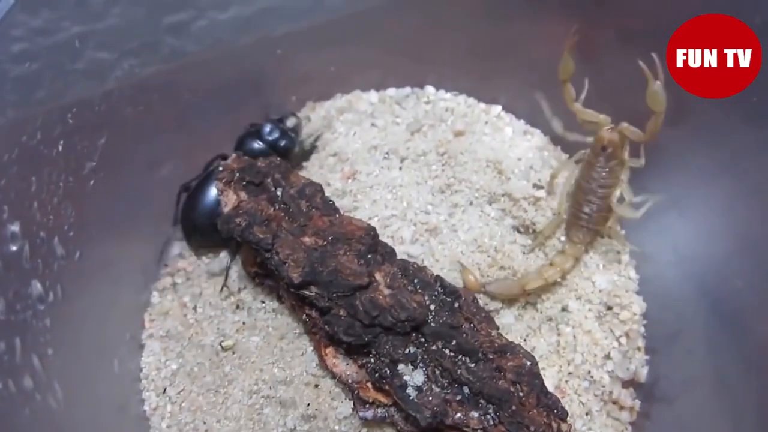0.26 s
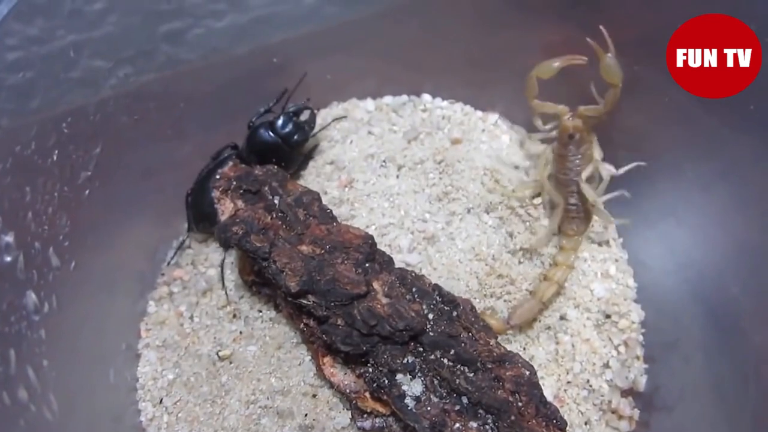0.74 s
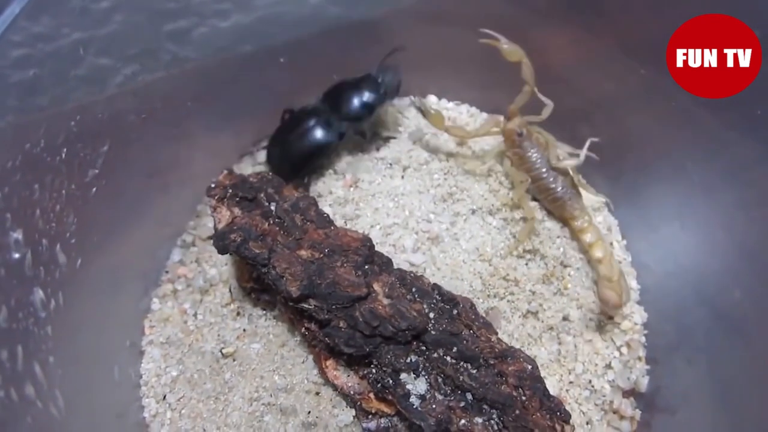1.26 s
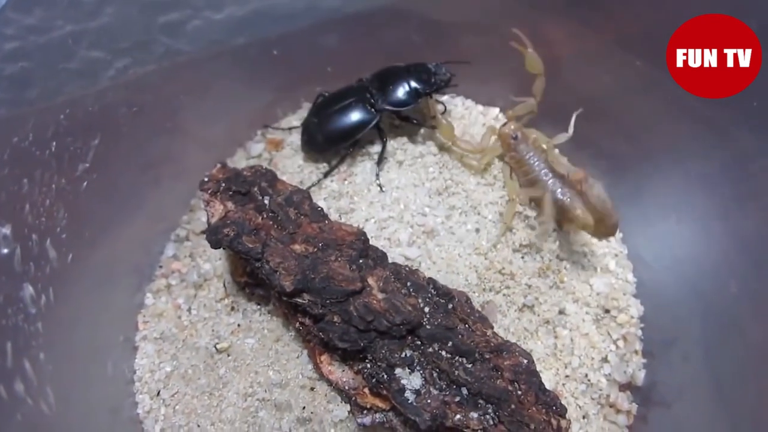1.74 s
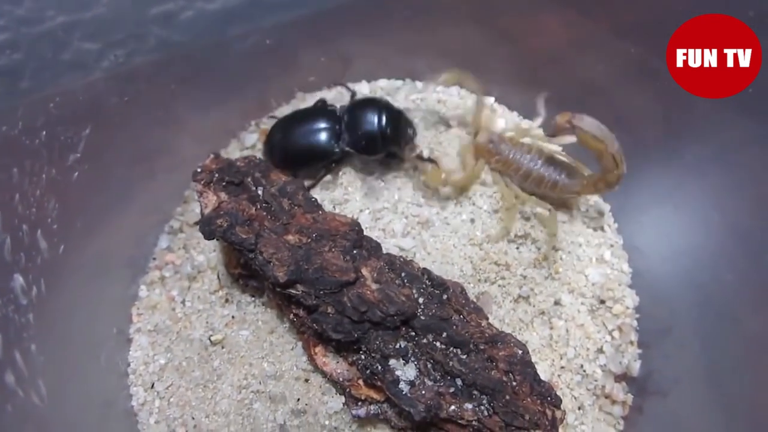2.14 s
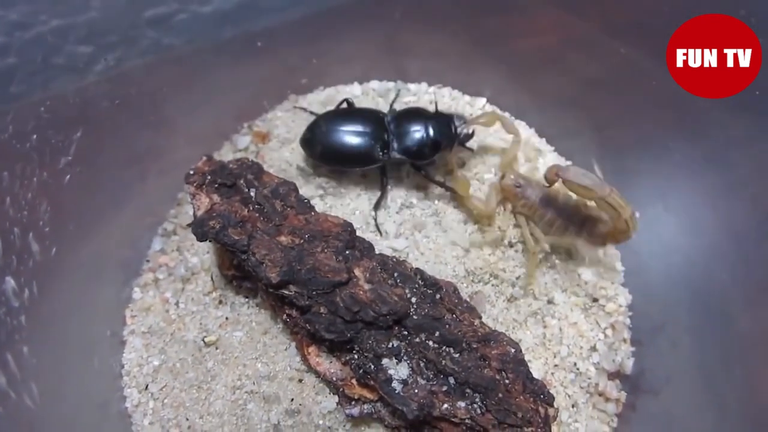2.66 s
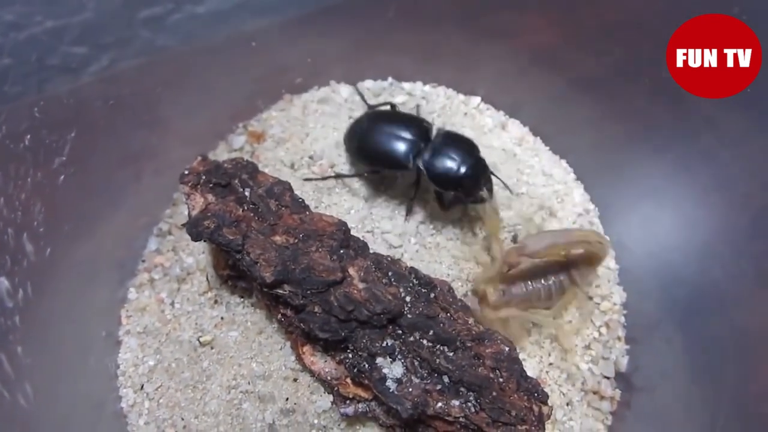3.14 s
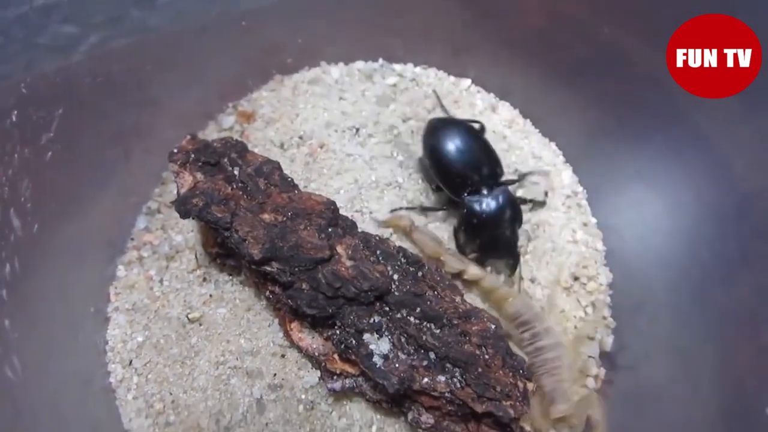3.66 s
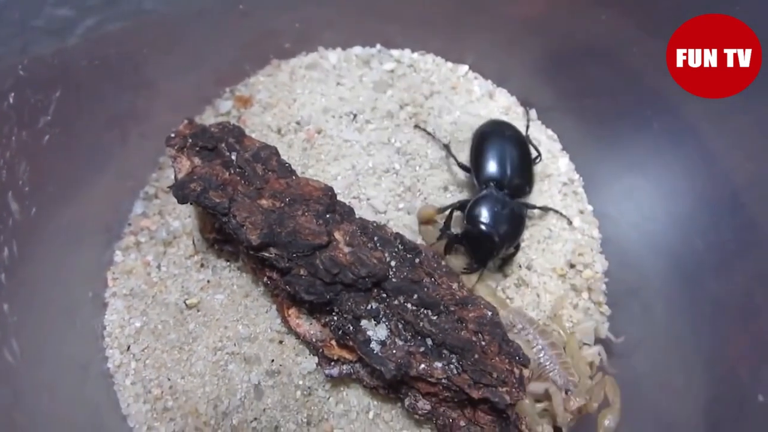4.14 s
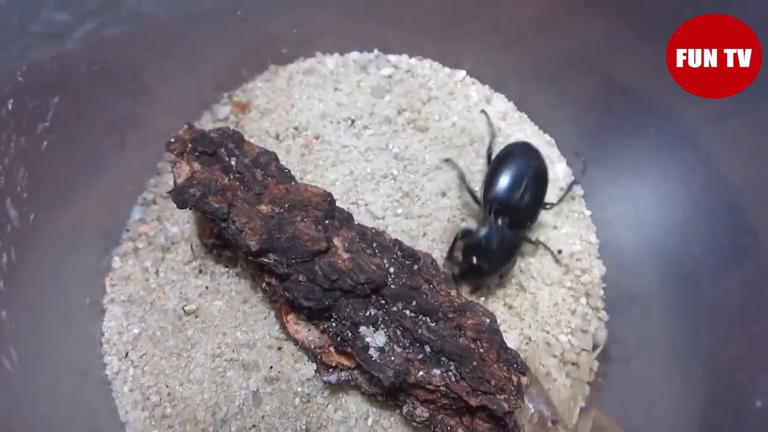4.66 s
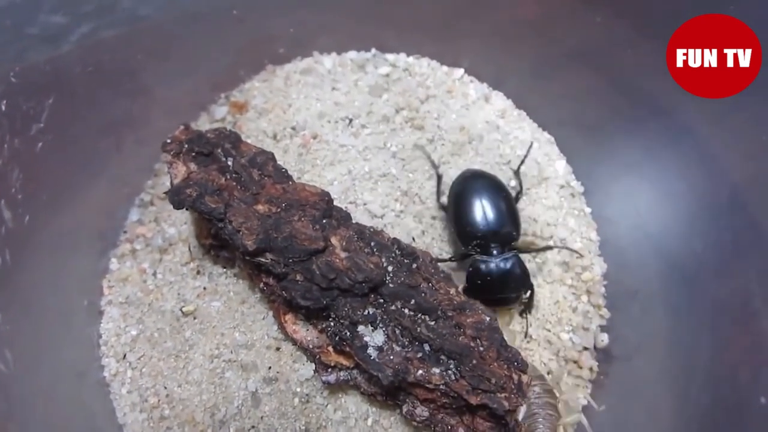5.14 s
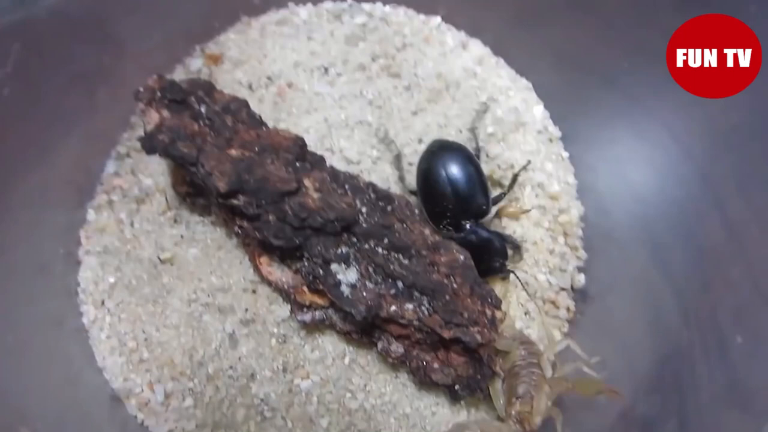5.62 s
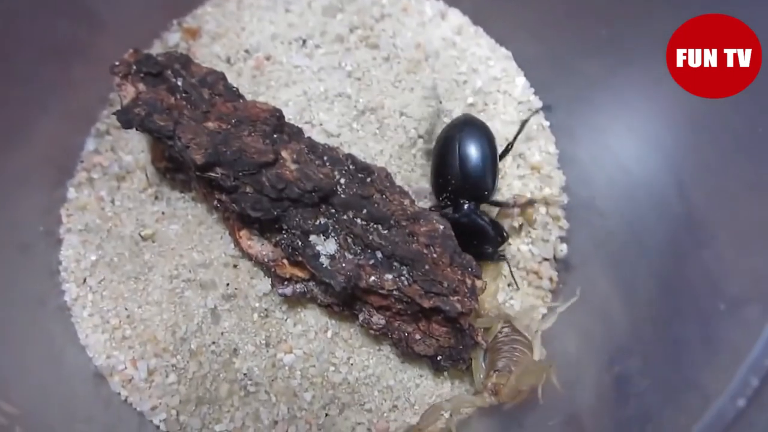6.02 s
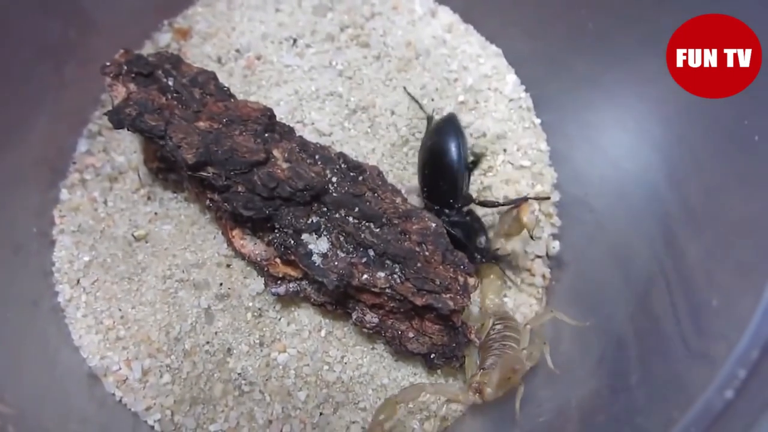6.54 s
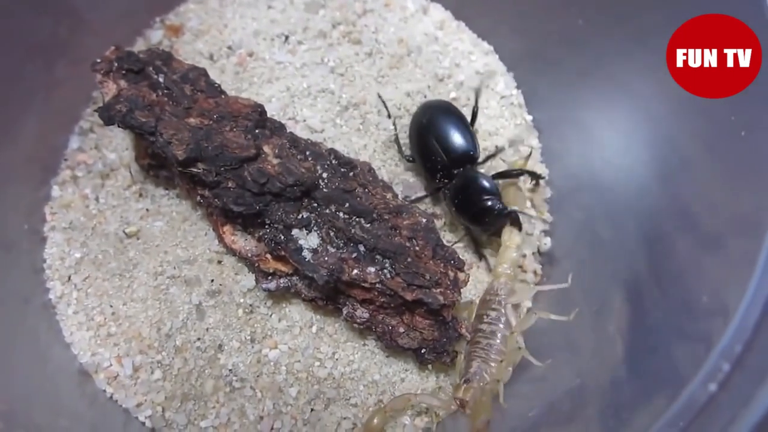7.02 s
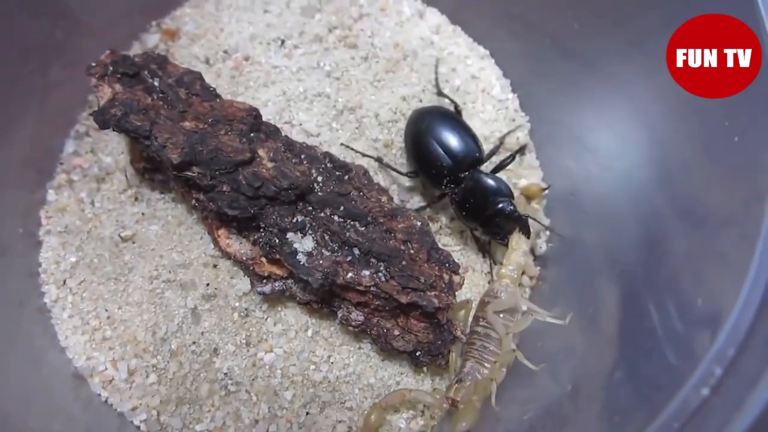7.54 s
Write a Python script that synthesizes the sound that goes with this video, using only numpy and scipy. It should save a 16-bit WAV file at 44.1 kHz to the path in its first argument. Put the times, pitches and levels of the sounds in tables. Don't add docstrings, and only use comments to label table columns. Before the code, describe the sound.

In a quiet room, heard from close above a small plastic tub of sand and bark, a beetle and scorpion scuffle over a constant low fan drone with slight hiss and very faint high whines. From 0 to 0.6 seconds a few crisp claw ticks and tiny skids ring on the plastic wall. After a brief lull, they gather from 0.9 into a dense, loud clatter with scratchy slips, brightest around 1.75, ending near 2. From 2 to 3.5 come softer, sparse shell ticks and sandy rustles. A distinct click lands at 3.6, then gritty leg strokes, with a small cluster of ticks around 4.55 to 4.8. Between 5 and 7 delicate jaw clicks and digging scrapes come and go, some sharp at 6.0, 6.2 and 7.05. Stronger snaps strike at 7.3 and 7.55, then only faint sand trickle and hum remain.

```python
import sys
import numpy as np
from scipy import signal
from scipy.fft import rfft, irfft, next_fast_len
from scipy.io import wavfile
from scipy.ndimage import map_coordinates

SR = 44100
rng = np.random.default_rng(int(sys.argv[2]) if len(sys.argv) > 2 else 0)


def gain_from_db(level_db):
    decades = np.asarray(level_db, float) / 20
    return 10 ** decades


def file_out(sig):
    cols = np.atleast_2d(sig).T
    lim = np.clip(cols, -1, 1)
    pcm = np.round(lim * 32767).astype(np.int16)
    wavfile.write(sys.argv[1], SR, pcm)


N = 343098

# t/s, peak level/dB, ring f/Hz, bright edge level/dB the
WALL_TICKS = [(0.906, -34, 5090, -8), (0.2314, -29.5, 4740, -19), (0.307, -22.5, 4250, -12),
              (0.32, -49, 7200, -16), (0.3791, -25.5, 5560, -24), (0.5385, -26, 6240, -6),
              (0.548, -30, 5600, -6), (0.928, -26.5, 5400, -12), (0.952, -24, 5430, -9),
              (0.964, -20.5, 6230, -4), (1.111, -16, 7060, 13), (1.134, -28, 5400, -14),
              (1.225, -19, 9230, -10), (1.2831, -24.5, 4880, 2), (1.3, -17, 6600, -11),
              (1.3611, -12.5, 4870, -18), (1.3682, -21.5, 2260, -21), (1.4124, -13, 7000, -8),
              (1.494, -36, 5360, -8), (1.526, -22.5, 7100, -21), (1.5816, -16.5, 6400, -19),
              (1.6425, -24.5, 5900, -19), (1.7097, -26, 4710, 5), (1.7323, -28, 7200, 5),
              (1.75, -14.5, 4600, 6.5), (1.761, -21, 8150, 12), (1.9025, -20.5, 4800, 3),
              (1.9582, -27, 6650, -8), (1.9796, -20.5, 4400, -28),
              (0.0989, -37, 6400, -10), (0.1785, -31, 7500, -13), (0.2728, -32, 5210, 5),
              (0.2919, -38, 4440, -10), (0.5455, -30, 7320, -5), (0.7785, -41, 6100, -12),
              (0.794, -36, 6350, 2), (0.9018, -37, 9300, 7), (0.9354, -27, 4260, -14),
              (0.9668, -22, 5800, -13), (0.9756, -27, 5900, 2), (1.035, -27, 7060, 0),
              (1.0395, -30, 11710, 5), (1.0714, -29, 6160, -13), (1.1047, -24, 6590, 4),
              (1.1291, -25, 7880, 1), (1.1634, -35, 5300, -7), (1.21, -25, 5330, -4),
              (1.2143, -22, 9430, 7), (1.2328, -25, 5040, -9), (1.2719, -30, 6070, -13),
              (1.2945, -30, 6550, -6), (1.3411, -34, 8400, 0), (1.381, -27, 5810, -9),
              (1.4004, -19, 7110, -14), (1.419, -23, 5340, -12), (1.468, -32, 7920, -5),
              (1.4974, -33, 5250, -15), (1.5136, -33, 5300, -14), (1.5337, -23, 5400, -19),
              (1.5444, -20, 7600, -12), (1.5621, -31, 5510, -13), (1.5653, -34, 6850, -14),
              (1.6065, -15, 7600, -13), (1.7539, -22, 6200, 2), (1.768, -26, 7970, 14),
              (1.7769, -28, 8310, 9), (1.7857, -34, 10290, 13), (1.8109, -32, 8910, 16),
              (1.8829, -27, 5080, 2), (1.9147, -35, 9650, 7)]
GRAPPLE_TICKS = [(2.041, -41, 3480, -17), (2.1869, -39.5, 4890, 0), (2.3235, -33, 5500, 7),
                 (2.6976, -40, 5440, -3), (2.845, -35, 6540, -14), (2.9263, -31, 6090, 2),
                 (2.9882, -28, 5350, 6), (3.0064, -30, 8340, 0), (3.157, -41, 3830, -5),
                 (3.161, -34, 2330, -22), (3.6102, -17.5, 5300, -37), (3.961, -40, 3630, -5),
                 (4.0243, -34, 8090, 1), (4.549, -25.5, 6650, -16), (4.5825, -29, 6690, 2),
                 (4.594, -27, 5890, 11), (4.6057, -34, 6840, 0), (4.613, -29.5, 6960, -1),
                 (4.6378, -30, 5260, -16), (4.711, -33, 5100, -20), (4.724, -36, 5200, -24),
                 (4.888, -35, 5470, -9), (5.0356, -34, 5400, -3), (5.1804, -36.5, 4900, -18),
                 (5.2566, -34, 5100, -21), (5.2655, -35.5, 5400, -19),
                 (2.0764, -42, 5170, -10), (2.1145, -44, 7060, -7), (2.2646, -35.5, 5300, 2),
                 (2.6102, -37, 6930, 0), (2.7359, -44, 5940, -6), (2.8734, -37, 5120, -13),
                 (2.8815, -38, 5210, -14), (3.0154, -34, 5250, 3), (3.0225, -31, 7410, 4),
                 (3.0437, -40, 5080, -3), (3.3716, -31, 11630, 14), (3.3813, -36, 5250, 2),
                 (3.6424, -33.5, 5340, -3), (3.7068, -37, 5170, -17), (3.7314, -36, 5040, -10),
                 (3.7513, -38, 5470, -12), (3.9108, -41, 3790, 7), (4.0108, -38, 6760, -1),
                 (4.0618, -37, 5080, -7), (4.2591, -37, 5080, 0), (4.279, -38, 5170, -1),
                 (4.284, -40, 5080, -13), (4.3864, -41, 5680, -19), (4.558, -23.5, 8230, 4),
                 (4.6946, -39, 6140, -10), (4.727, -33.5, 5080, -10), (4.7477, -44, 5510, -22),
                 (4.7533, -39, 4910, -24), (4.7637, -35, 5040, -21), (4.769, -36, 5000, -23),
                 (4.7799, -35, 5170, 1), (4.9444, -35, 5680, -12), (5.2264, -42, 3830, -12)]
TUG_TICKS = [(5.675, -35, 5470, -4), (5.8097, -38, 5220, -15), (5.8378, -34, 5260, -23),
             (5.8534, -34, 6100, -20), (6.034, -25, 5660, 8), (6.0405, -28, 6140, -6),
             (6.1087, -29, 4970, -21), (6.214, -33, 5500, -16), (6.2314, -26.5, 12000, 22),
             (6.2537, -31, 12000, 22), (6.4332, -34, 5100, -6), (6.52, -34.5, 4140, -5),
             (6.6804, -35.5, 6600, -1), (6.747, -34.5, 5260, -18), (6.977, -42, 5400, -11),
             (7.0091, -42, 4980, -5), (7.0406, -30, 5480, 17), (7.053, -27, 5560, 11),
             (7.059, -28, 5640, -11), (7.073, -35, 5580, -14), (7.0903, -38, 5100, -5),
             (7.286, -38, 2300, -24), (7.295, -34, 2100, -24), (7.304, -19.5, 5270, -22),
             (7.306, -31, 2200, -24), (7.547, -25, 2950, -24), (7.56, -34, 11500, 14),
             (7.604, -38.5, 2000, -24), (6.779, -35, 9000, 8), (7.128, -40, 9000, 10),
             (7.332, -36, 5300, 2), (7.3414, -25, 4000, 1), (7.4767, -28.5, 5360, 4),
             (7.546, -17.5, 3940, -0.5), (7.5493, -12.5, 6330, 14), (7.556, -34, 5000, -11),
             (5.5899, -41, 5340, 0), (5.6934, -43, 5300, -10), (5.7384, -36, 4820, -16),
             (5.7419, -41, 5700, -17), (5.8024, -39, 5300, -17), (5.8445, -36, 5600, -17),
             (5.864, -36, 5120, -16), (5.8866, -47, 5730, -1), (6.101, -33, 5600, -21),
             (6.1216, -38, 5500, -16), (6.199, -39, 5000, -13), (6.2486, -37, 7320, 8),
             (6.2858, -44, 5250, -14), (6.358, -35.5, 5900, -16), (6.4697, -40, 5640, -14),
             (6.4834, -42, 5340, -15), (6.507, -42, 5380, -17), (6.5902, -45, 5080, -12),
             (6.7582, -36, 6030, -13), (7.0765, -39, 3920, -8), (7.1327, -45, 5040, -10),
             (7.2524, -43, 5560, -18), (7.2986, -43, 5040, -9), (7.3559, -30, 5860, 12),
             (7.3776, -37, 3800, -4), (7.5371, -30, 11670, 7)]


def ticks():
    on_wall = WALL_TICKS
    off_wall = GRAPPLE_TICKS + TUG_TICKS
    start_s, peak_db, ring_hz, edge_db = np.transpose(on_wall + off_wall)[:, :, None]
    count = len(start_s)
    on_sand = (np.arange(count) >= len(on_wall))[:, None]

    knock_db = -15.5 - 14 * np.log2(ring_hz / 5000) + 1.5 * rng.standard_normal(start_s.shape)
    knock_db = knock_db - 5 * on_sand

    t = np.arange(1024) / SR
    rattle = 0.1 * gain_from_db(-60 * t / 0.011)
    echo = 0.008 * gain_from_db(-60 * t / 0.05)
    blows = rng.standard_normal((count, len(t))) * (rattle + echo)
    blows[:, 0] = -1.4

    def blunt_tip(f):
        treble_loss = 1 + (1j * f / 11000) + (1j * f / 12500) ** 2
        return mode(f, np.sqrt(5200 * ring_hz), 6700) / treble_loss

    body, edge = contact(blows, ring_hz, on_sand)
    body = filtered(body, blunt_tip)
    knock = filtered(blows, lambda f: mode(f, 2370, 1400) ** 2)

    def equal_energy(x):
        return x / np.linalg.norm(x, axis=1, keepdims=True)

    hits = equal_energy(body) + gain_from_db(edge_db - 2.5) * equal_energy(edge)
    hits = hits + gain_from_db(knock_db) * equal_energy(knock)
    peak = np.abs(hits).max(axis=1, keepdims=True)
    return place(gain_from_db(peak_db - 0.9) * hits / peak, start_s)


# middle t/s, rms level/dB, length/s, ring f/Hz
WALL_SLIPS = [(0.008, -43.5, 0.019, 5400), (0.165, -44, 0.013, 5300), (0.286, -46, 0.015, 5020),
              (0.31, -34.5, 0.004, 5290), (0.322, -32, 0.0038, 7600), (0.747, -59, 0.12, 6350),
              (0.105, -49, 0.015, 6400), (1.202, -47, 0.017, 5200), (1.47, -48, 0.015, 5300),
              (2.035, -57.5, 0.013, 7500), (0.545, -40, 0.019, 6900), (0.566, -49, 0.036, 7000),
              (0.493, -51.5, 0.036, 6000), (0.927, -40, 0.017, 7000), (0.968, -43.5, 0.047, 6130),
              (1.032, -43, 0.067, 7700), (1.059, -37, 0.0067, 5400), (1.112, -36, 0.015, 6990),
              (1.132, -37.5, 0.015, 5430), (1.221, -36, 0.031, 8200), (1.248, -42, 0.019, 5440),
              (1.301, -36, 0.015, 7000), (1.163, -46, 0.019, 6500), (1.378, -40, 0.024, 4900),
              (1.413, -30.5, 0.03, 7050), (1.431, -43, 0.041, 5300), (1.536, -39.5, 0.025, 5900),
              (1.572, -43.5, 0.02, 6100), (1.6, -35, 0.034, 7000), (1.717, -43, 0.0049, 4930),
              (1.733, -32, 0.008, 7060), (1.754, -40, 0.022, 6130), (1.788, -56, 0.044, 8400),
              (1.887, -38, 0.01, 5540), (1.899, -32.5, 0.011, 4800), (1.916, -43, 0.011, 6290)]
# middle t/s, rms level/dB, length/s, fine grain level/dB
GRAPPLE_STROKES = [(2.089, -49, 0.021, 3), (2.256, -52.5, 0.035, 1), (2.339, -49.5, 0.018, 5.5),
                   (2.576, -52, 0.042, 0), (2.715, -52, 0.027, 0), (2.777, -51, 0.045, -1),
                   (2.861, -50, 0.017, 0), (2.885, -47.5, 0.025, -5), (3.024, -58, 0.11, 4.5),
                   (2.962, -53, 0.02, 2), (3.128, -55.5, 0.04, 4), (3.5, -58, 0.015, -12),
                   (3.903, -52.5, 0.015, 0), (4.017, -57, 0.014, 7), (3.156, -57.5, 0.041, 1),
                   (3.37, -56, 0.07, 0.5), (3.685, -48, 0.041, -21), (3.747, -43.5, 0.043, -12),
                   (3.785, -42, 0.035, -5), (3.849, -47.5, 0.018, -13), (4.071, -47.5, 0.035, -12),
                   (4.099, -43.5, 0.01, -9), (4.113, -34, 0.014, -27), (4.261, -50.5, 0.022, -3),
                   (4.396, -54.5, 0.019, -22), (4.553, -47.5, 0.03, 8.5), (4.644, -53.5, 0.06, -1),
                   (4.776, -48.5, 0.026, -21)]
# middle t/s, rms level/dB, length/s, fine grain level/dB
TUG_STROKES = [(4.967, -43.5, 0.042, -18), (5.028, -43, 0.086, -13), (5.454, -58.5, 0.096, -23),
               (5.784, -55, 0.032, -20), (6.17, -59, 0.065, -20), (5.896, -59, 0.064, -12),
               (5.665, -55, 0.15, -4), (5.747, -50.5, 0.038, -27), (5.869, -53, 0.05, -7),
               (6.111, -45.5, 0.058, -23), (5.558, -65, 0.037, -17), (6.194, -57, 0.036, -18),
               (6.55, -59, 0.19, -14), (6.338, -52.5, 0.067, -5), (6.777, -47, 0.034, -8),
               (6.815, -52.5, 0.036, -17), (6.857, -57, 0.03, -20), (7.04, -52, 0.043, -3),
               (7.05, -56, 0.011, -14), (7.117, -51, 0.028, -13), (7.205, -47, 0.0072, -20),
               (7.3, -37.5, 0.0077, -4), (7.412, -60, 0.074, -14), (7.287, -50, 0.018, -13),
               (7.313, -41, 0.022, -2), (7.355, -45.5, 0.045, -5), (7.47, -43.5, 0.0058, 0),
               (7.55, -38, 0.02, -13), (7.601, -50, 0.017, -22), (7.673, -54.5, 0.016, 4)]
WALL_FINE_DB = -14
RIM_START_S, RIM_END_S, RIM_FINE_DB = 1.7, 1.85, 12
SAND_RING_HZ, SAND_OWN, WALL_OWN = 5200, 0.14, 1
CLUMP_DB, GRAIN_SPREAD_DB = 3.5, 5.5


def scrapes():
    wall = [(s, db, length, hz, WALL_FINE_DB + RIM_FINE_DB * (RIM_START_S < s < RIM_END_S))
            for s, db, length, hz in WALL_SLIPS]
    sand = [(s, db, length, SAND_RING_HZ, fine) for s, db, length, fine in GRAPPLE_STROKES + TUG_STROKES]
    middle_s, rms_db, length_s, ring_hz, fine_db = np.transpose(wall + sand)[:, :, None]
    count = len(middle_s)
    on_sand = (np.arange(count) >= len(wall))[:, None]

    t = np.arange(-6144, 6144) / SR
    steepness = np.where(t < 0, 3.3, 2.4)
    stroke = np.exp(-0.5 * np.abs(t / (0.5 * length_s)) ** steepness)
    row = np.arange(count)[:, None] + 0 * t
    knot = 60 + 400 * t + 0 * middle_s
    clumps = map_coordinates(rng.standard_normal((count, 120)), [row, knot])
    force = stroke * gain_from_db(CLUMP_DB * clumps) * grit((count, len(t)), GRAIN_SPREAD_DB)

    body, edge = contact(force, ring_hz, on_sand, np.where(on_sand, SAND_OWN, WALL_OWN))
    body = filtered(body, lambda f: np.where(on_sand, mode(f, 4200, 4400), 1 + 0.38 * mode(f, 3600, 800)))

    def as_strong_as_stroke(x):
        return x * np.linalg.norm(stroke, axis=1, keepdims=True) / np.linalg.norm(x, axis=1, keepdims=True)

    strokes = as_strong_as_stroke(body) + gain_from_db(fine_db - 4.0) * as_strong_as_stroke(edge)
    return place(gain_from_db(rms_db - 2.5) * strokes, middle_s + t[0])


# t/s, level/dB, coarse over fine grains/dB
RESTLESS_LEGS = [(0.0, -52.5, -8.5), (0.35, -51, -2.5), (0.52, -53, -1.5), (0.62, -60, 0), (0.88, -53.5, 5),
                 (0.95, -50.5, 1), (1.13, -50.5, 2), (1.5, -50, 5), (1.66, -59.5, 5), (1.85, -62, -8),
                 (2.1, -59, -12.5), (2.6, -61, -9.5), (2.9, -54.5, 2), (3.31, -63.5, -8), (3.88, -55.5, 0),
                 (4.4, -55, 6.5), (4.75, -54.5, 0.5), (5.31, -59, -6), (6.28, -56.5, 2), (6.87, -62, 5),
                 (7.28, -53.5, -5), (7.78, -61, 0)]
# f/Hz, level/dB
FINE_GRAINS = [(500, -9), (1000, -5), (1700, -9), (3000, -7), (7000, -8), (11000, -12), (16000, -27)]


def drag():
    level_db, coarse_db = curves(RESTLESS_LEGS)
    restless_db = 1.6 * wobble(35)
    coarse_clumps_db = restless_db + 2.9 * wobble(7.9) + 3.1 * wobble(180)
    coarse = gain_from_db(coarse_clumps_db) * grit(N, spread_db=4.0)
    fine = gain_from_db(restless_db + 2.6 * wobble(150)) * grit(N, spread_db=4.0)
    coarse = unit(filtered(coarse, lambda f: sanded_tub(f) * mode(f, 4500, 4600)))
    fine = unit(filtered(fine, lambda f: gain_from_db(along(FINE_GRAINS, f))))
    return gain_from_db(level_db - 5.5) * (gain_from_db(coarse_db / 2) * coarse + gain_from_db(-coarse_db / 2 + 1.6) * fine)


def grit(shape, spread_db):
    return rng.standard_normal(shape) * gain_from_db(spread_db * rng.standard_normal(shape))


def contact(force, ring_hz, on_sand, own_share=0.6):
    lag_s = rng.uniform(0.0001, 0.000635, (len(force), 1))

    def near_wall(f):
        return 1 + 0.35 * np.exp(-2j * np.pi * f * lag_s)

    def body_ring(f):
        own_ring = own_share * mode(f, ring_hz, 0.18 * ring_hz)
        ring = np.where(on_sand, sanded_tub(f), free_tub(f)) + own_ring
        low_thud = gain_from_db(-18.5) * mode(f, 790, 620)
        return near_wall(f) * (ring * mode(f, 5150, 6800) + low_thud)

    edge_hz = np.minimum(9300 * (ring_hz / 5500) ** 0.17, 15000)

    def edge_ring(f):
        return near_wall(f) * mode(f, edge_hz, 6800) ** 2 / (1 + 1j * f / 14000) ** 2

    return filtered(force, body_ring), filtered(force, edge_ring)


# f/Hz, width/Hz, level/dB
FREE_TUB = [(2920, 1300, -6.5), (3613, 340, -1.5), (5100, 1040, -11), (5870, 455, 4), (7000, 6200, -6.5)]


def free_tub(f):
    return tub(f, FREE_TUB, dip_depth=0.5)


# f/Hz, width/Hz, level/dB
SANDED_TUB = [(2870, 750, -14), (3830, 490, -4.5), (5116, 610, -3.5), (5770, 570, 1), (7200, 4300, -10)]


def sanded_tub(f):
    return tub(f, SANDED_TUB, dip_depth=0.9)


def tub(f, modes, dip_depth):
    dip = 1 - dip_depth * mode(f, 4500, 480)
    return dip * sum((-1) ** k * gain_from_db(db) * mode(f, hz, width) for k, (hz, width, db) in enumerate(modes))


# f/Hz, level/dB per Hz
AIR = [(16, -19), (32, -9.5), (70, -10), (123, 0), (166, 3.5), (270, -5.5), (427, -22), (531, -24.5),
       (677, -27.5), (2280, -34), (4370, -44.5), (5570, -39), (8140, -50), (13200, -45.5), (16000, -57)]
# f/Hz, width/Hz, level/dB
ROOM_MODES = [(54.4, 5, 3), (62, 5, -0.5), (93, 6.7, -4.5), (107.4, 5.4, 0.5), (114, 3.3, -5.5),
              (156, 11, -1.5), (199.6, 12.3, 3), (209.3, 11, -7), (245, 3.6, -5.5), (259, 13.5, -4),
              (287.6, 13, -4), (340, 6.6, -3.5), (365.5, 9, 3.5)]
# f/Hz, width/Hz, level/dB
HUM = [
    (133, 17, -50),
    (260.5, 11, -54),
    (302.7, 9.5, -66),
    (468.5, 13, -74.5),
    (529.2, 23, -69),
    (7900, 120, -72),
    (13550, 120, -88),
]


def drone():
    def room(f):
        bumps_db = sum(db / (1 + ((f - hz) / width) ** 2) for hz, width, db in ROOM_MODES)
        return gain_from_db(along(AIR, f) + bumps_db)

    air = unit(filtered(rng.standard_normal(N), room))
    tones = np.zeros(N)
    for hz, width, db in HUM:
        tone = filtered(rng.standard_normal(N), lambda f: mode(f, hz, width) ** 2)
        tones += gain_from_db(db) * unit(tone)
    return gain_from_db(-43.5 + 0.86 * wobble(1.985)) * air + tones


def mode(f, hz, width):
    return 1j * f * width / (hz * hz - f * f + 1j * f * width)


def filtered(x, response):
    m = next_fast_len(x.shape[-1] + 8192)
    return irfft(rfft(x, m) * response(np.fft.rfftfreq(m, 1 / SR)), m)[..., :x.shape[-1]]


def place(rows, start_s):
    at = np.round(start_s * SR).astype(int) + np.arange(rows.shape[1]) + SR
    return np.bincount(at.ravel(), rows.ravel(), N + 2 * SR)[SR:SR + N]


def unit(x):
    return x / np.sqrt(np.mean(x ** 2) + 1e-20)


def along(points, hz):
    f, value = np.transpose(points)
    return np.interp(np.log(hz + 1), np.log(f + 1), value)


def curves(rows):
    s, *columns = np.transpose(rows)
    return [np.interp(np.arange(N) / SR, s, column) for column in columns]


def wobble(rate):
    knots = rng.standard_normal(int(N * rate / SR) + 4)
    return map_coordinates(knots, [np.arange(N) * rate / SR])


def scene():
    return (ticks() + scrapes() + drag() + drone())[None]


def roll_off(x):
    return signal.sosfilt(signal.butter(12, 16640, fs=SR, output="sos"), x)


def record(dry):
    top_hz = 15800

    def pass_band(f):
        bass_cut = f * f / (f * f + 30 ** 2)
        remnant = gain_from_db(-33) * (f < 1.035 * top_hz)
        return np.where(f < top_hz, bass_cut, remnant)

    return roll_off(filtered(dry, pass_band))


dry = scene()
out = record(dry)
file_out(out)
```